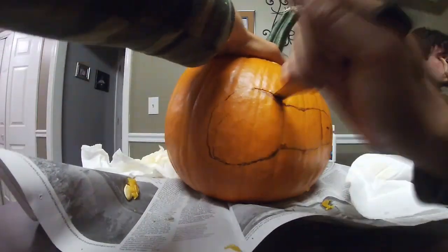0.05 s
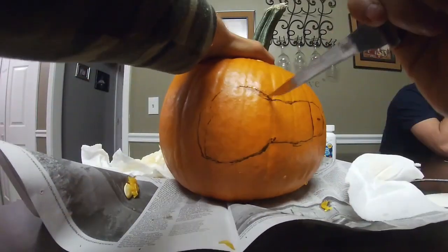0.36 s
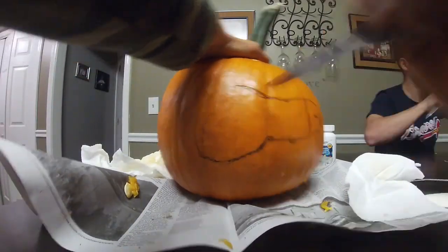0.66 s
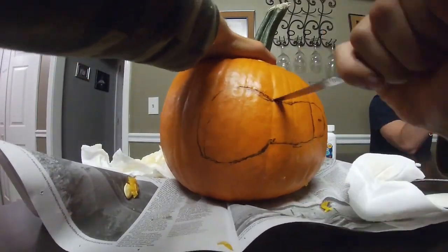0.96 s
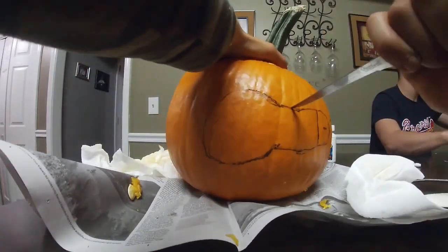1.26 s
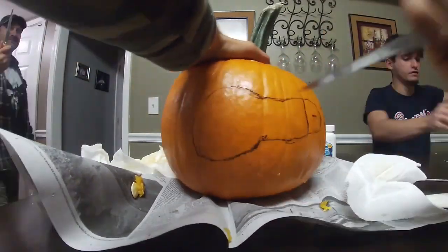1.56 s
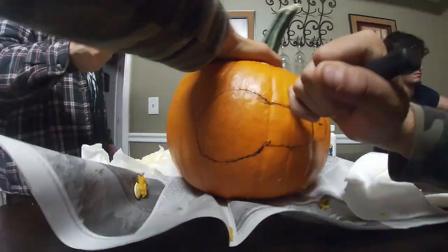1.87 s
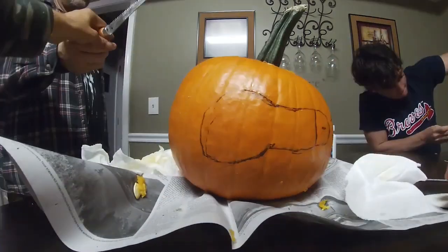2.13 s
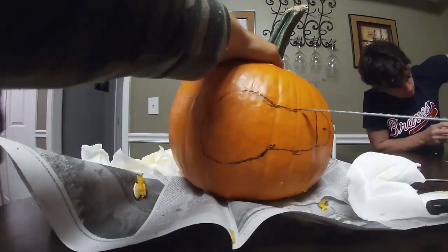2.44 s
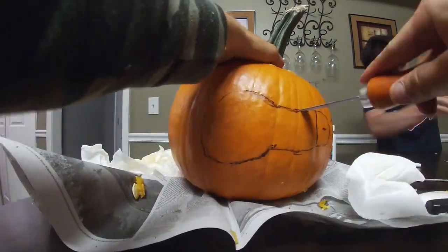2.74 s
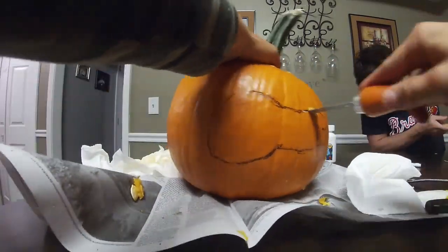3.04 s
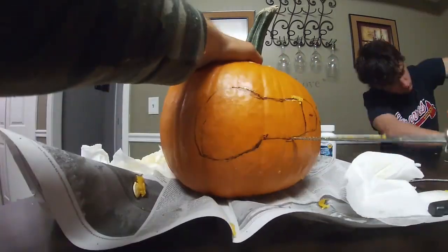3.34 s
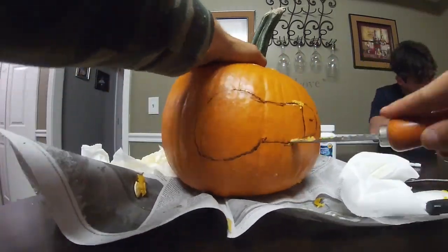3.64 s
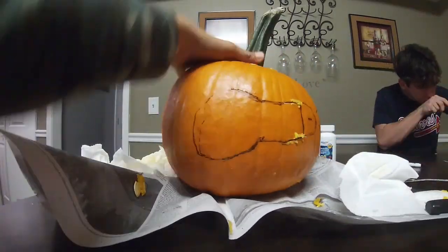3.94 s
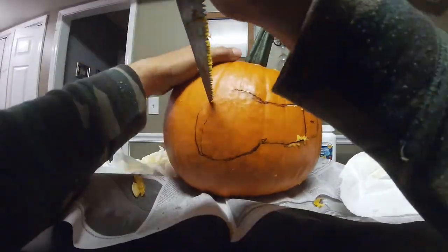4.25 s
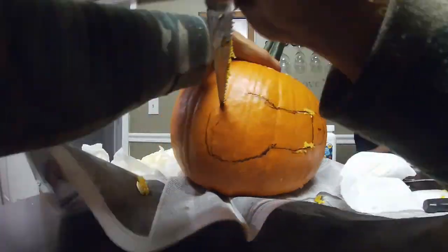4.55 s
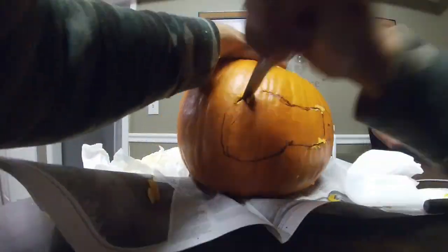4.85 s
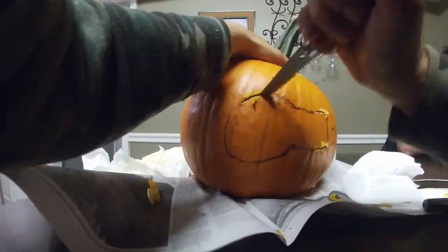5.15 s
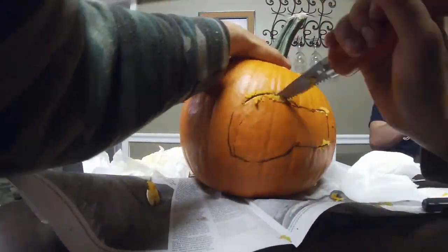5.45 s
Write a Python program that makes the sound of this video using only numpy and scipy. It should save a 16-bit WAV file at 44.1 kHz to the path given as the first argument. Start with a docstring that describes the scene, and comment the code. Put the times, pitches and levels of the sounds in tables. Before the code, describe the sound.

A knife works through a pumpkin in short, uneven strokes close to the microphone. The rind splits with small cracks that thud in the hollow fruit, and the toothed blade scrapes between them. The wet flesh squeaks against the steel several times, then rasps and judders near the end. Tiny juice pops, a few soft bumps on the table and faint rustling of hands and paper fill the gaps in a small, quiet room.

```python
"""A knife is worked through a pumpkin on a newspaper-covered table, close by, in a small room.
The rind splits in short cracks that thud in the hollow fruit. The knife's teeth scrape and make the
blade ring. The wet flesh grips the steel and lets it slip, so it squeals, rasps and judders.
Juice pops in the cut, the fruit rocks on the table, and hands and paper rustle in between."""
import sys
import numpy as np
from scipy import signal
from scipy.fft import rfft, irfft
from scipy.io import wavfile
from scipy.ndimage import uniform_filter1d, map_coordinates

SR = 44100
rng = np.random.default_rng(int(sys.argv[2]) if len(sys.argv) > 2 else 0)


def persist_wave(psi):
    """Save psi, clipped to +-1, as 16-bit WAV."""
    counts = np.round(np.clip(psi, -1, 1) * 32767).astype(np.int16)
    wavfile.write(sys.argv[1], SR, np.atleast_2d(counts).T)


N = 246959
TIME = np.arange(N) / SR
TOP_HZ = 16000

# Splits in the rind: t/s, level/dB, snap against thud/dB, run time/s
CRACKS = [(0.046, -13.5, -24, 0.015), (0.062, -17.5, -20, 0.0027), (0.091, -27, -2, 0.01),
          (0.103, -21.5, -7.5, 0.029), (0.151, -25.5, -45, 0.0049), (0.231, -29.5, -30, 0.0034),
          (0.698, -28, 1, 0.019), (0.723, -24.5, -6, 0.014), (0.753, -30.5, -27, 0.0034),
          (1.06, -20, -20, 0.011), (1.083, -19.5, -24, 0.0095), (1.111, -18, -27, 0.0087),
          (1.149, -21, -44, .01), (1.917, -18.5, -15, 0.02), (1.963, -24.5, -11, 0.029),
          (2.026, -22.5, -41, 0.0038), (2.051, -22.5, -49, .005), (2.382, -26.5, -23, 0.0034),
          (2.779, -29.5, -34, 0.0061), (2.861, -26.5, -10, .035), (2.904, -16.5, -38, 0.02),
          (2.972, -30, -39, 0.033), (3.019, -24.5, -33, 0.0066), (3.063, -23.5, -37, 0.039),
          (3.14, -29, -14.5, 0.029), (3.184, -22, -26, 0.0089), (3.483, -36, -21, 0.013),
          (3.564, -22, -24, .005), (3.618, -16.5, -41, 0.0054), (3.681, -38, -33, 0.041),
          (3.74, -19, -17, 0.014), (3.756, -15, -50, 0.014), (3.831, -19, -35, 0.0051),
          (3.868, -24.5, -19, 0.013), (4.037, -22.5, 0.5, 0.02), (4.532, -31.5, -30, 0.013),
          (4.602, -13.5, -34, 0.0095), (4.736, -16, -17, 0.0073), (4.748, -17, -11.5, 0.017),
          (4.822, -31, -2.5, .005), (5.571, -29.5, -18, 0.017)]
# Short pushes of the blade: t/s, rise/s, level/dB, centre f/Hz, wetness/dB
SCRAPES = [(0.038, 0.0074, -31, 2250, -6), (0.65, 0.0021, -36.5, 2310, -13),
           (0.667, 0.0082, -28, 2230, -10), (1.048, .002, -32, 2370, -9), (1.322, 0.00076, -32, 2870, 3),
           (1.341, 0.0098, -28, 2870, 5), (1.379, 0.0096, -35, 1900, -26), (1.499, .0074, -28.5, 1560, -37),
           (1.514, 0.016, -31.5, 2180, -9.5), (1.597, 0.0084, -25.5, 3270, -30),
           (1.62, 0.0061, -28, 3030, -55), (1.682, 0.0016, -24, 2190, -25),
           (1.819, 0.0044, -39.5, 1980, -13), (1.899, 0.0045, -34.5, 2960, -3.5),
           (2.091, 0.0014, -43, 2380, -28), (2.31, .0024, -25.5, 2830, 0.5), (2.37, 0.017, -34, 1760, -38),
           (2.496, 0.0013, -35.5, 1600, -33), (2.604, 0.0009, -33, 2170, -9.5),
           (2.688, 0.0049, -42, 2400, -6), (2.735, 0.019, -23.5, 1980, -19),
           (2.822, 0.0032, -31.5, 1880, -17), (2.988, 0.012, -25, 2170, -18.5),
           (3.04, 0.018, -33.5, 2210, -16), (3.555, 0.0018, -32.5, 1700, -12),
           (3.593, 0.015, -28.5, 2120, -10.5), (3.725, .013, -27, 2370, -13.5),
           (3.817, 0.0065, -28, 1890, -12), (3.868, 0.017, -35, 1910, -15), (4.315, 0.0031, -39, 1900, -56),
           (4.49, 0.00033, -21.5, 2750, -48), (4.523, 0.003, -39, 2250, -6),
           (4.668, .0054, -32.5, 2790, -18), (4.717, 0.007, -22, 3020, -14),
           (4.814, 0.0063, -22.5, 2600, -2.5), (4.832, 0.016, -26, 2280, -6), (4.869, 0.002, -28, 2550, -5),
           (4.914, 0.011, -30.5, 2150, -24), (5.265, 0.013, -32, 2400, -10),
           (5.496, 0.0013, -32, 2210, -26)]
# Clean, squealing slides: t/s, length/s, level/dB, slip f/Hz, glide/share, arch/share, sharpness/dB
SQUEALS = [(1.387, .024, -5.5, 1302, -0.24, -0.066, -9), (1.411, 0.018, -9.5, 1205, -0.11, 0.043, -11),
           (2.122, 0.022, -11, 1218, 0.045, -0.0088, -13), (2.146, 0.033, -13.5, 1239, -0.054, -0.018, -15),
           (2.187, 0.012, -18, 1230, -0.13, 0.11, -16), (2.204, 0.019, -21.5, 1186, -0.051, 0.058, -4),
           (2.236, 0.011, -9, 1216, 0.026, 0.085, -26), (2.255, 0.0084, -16, 1193, -0.039, 0.035, 9),
           (2.272, 0.021, -18.5, 1403, -0.039, -0.008, -7.5), (2.848, .017, -14.5, 1180, -0.132, -0.11, 9),
           (2.865, 0.033, -20, 1105, 0.048, 0.049, -5.5), (3.932, 0.02, -10.5, 1298, -0.14, 0.15, 5.5),
           (3.953, 0.02, -16.5, 1103, 0.019, -0.015, -6), (3.967, .031, -20.5, 1208, -0.093, 0.086, 16),
           (3.998, 0.035, -23, 1048, 0.045, 0.024, -6), (4.025, 0.032, -20, 1120, -0.089, 0.028, -7),
           (4.06, 0.023, -18, 1081, -0.06, 0.033, -19.5), (4.082, 0.012, -19.5, 1144, -0.023, 0.12, -17),
           (4.102, 0.019, -14.5, 1196, 0.077, 0.0034, -43)]
# Slower, hoarser slides: same columns as SQUEALS
RASPS = [(1.204, 0.017, -29, 1040, 0.18, 0.023, -8), (1.228, 0.049, -35, 764, 0.065, 0.038, 9),
         (1.283, 0.023, -31.5, 880, 0.13, 0.037, 12.5), (1.33, 0.034, -23.5, 1120, -0.32, 0.011, -19),
         (1.596, 0.073, -24, 992, -0.34, 0.0027, -34), (4.978, 0.0417, -17, 876, 0.094, 0.049, -1.5),
         (5.037, 0.0079, -9, 1010, -0.094, 0, -18), (5.054, 0.036, -21.5, 908, -0.072, 0.029, 2.5),
         (5.093, 0.046, -19.5, 924, -0.056, 0.013, 4.5), (5.138, 0.053, -23.5, 975, 0.0083, 0.0077, 9.5),
         (5.196, 0.025, -18, 1025, -0.043, 0, 5), (5.223, 0.04, -17.5, 1049, -0.021, 0.0026, 0),
         (5.352, 0.028, -15, 867, -0.17, 0, -11), (5.379, 0.024, -16.5, 848, 0.1, 0.039, 2),
         (5.525, 0.039, -24.5, 817, 0.23, 0.038, 4), (5.557, 0.097, -29, 988, -0.011, 0, 13.5)]
# Slips that lose their rhythm: t/s, rise/s, fall/s, relative level/dB
JUDDERS = [(2.868, 0.03, 0.012, -28.5), (5.005, 0.01, 0.0099, -18), (5.158, 0.0009, 0.016, -15),
           (5.229, 0.011, 0.011, -19), (5.376, 0.0046, 0.021, -17.5), (5.437, .0075, 0.016, -16.5),
           (5.562, 0.0089, 0.027, -17.5)]
# Juice pops in the cut: t/s, relative level/dB
POPS = [(0.0094, -31.5), (0.1296, -45), (0.191, -48), (0.226, -43), (0.3167, -43), (0.4563, -48),
        (0.5756, -44), (0.635, -39), (0.9878, -32.5), (1.0164, -27.5), (1.1308, -33.5), (1.545, -22),
        (2.135, -26), (2.1664, -39), (2.234, -34), (3.1416, -30.5), (3.1643, -37), (3.271, -42.5),
        (3.3308, -35.5), (3.409, -38), (3.496, -42), (3.9256, -24), (4.029, -26), (4.103, -35),
        (4.417, -40), (4.796, -34)]
# The pumpkin rocks against the table: t/s, f/Hz, level/dB
BUMPS = [(1.546, 114, -9.5), (1.575, 99, -19.5), (2.504, 145, -25), (2.697, 128, -23.5), (4.914, 139, -24),
         (5.01, 100, -30.5)]
# How busily the hands move on fruit and paper: t/s, relative level/dB
HANDS = [(0, -47), (.25, -60.5), (.58, -64), (.68, -56), (.79, -70), (.95, -64), (1.08, -62), (1.55, -43.5),
         (1.77, -58), (2, -53), (2.46, -58), (2.85, -41.5), (3.17, -55.5), (3.25, -66), (3.52, -47),
         (4.08, -48.5), (4.18, -66.5), (4.38, -57), (4.48, -48.5), (4.95, -46), (5.6, -48.5)]

# The notes at which a thing rings: f/Hz, width/Hz, level/dB
FRUIT_MODES = [(150, 90, -9.5), (295.7, 104, 3), (380, 34, -4), (585, 130, -13), (773, 540, -35)]  # the hollow fruit
BLADE_MODES = [(1160, 160, -9), (1450, 110, -2), (1870, 110, -4), (2085, 100, 2), (2580, 220, -3),
               (3050, 250, -6), (3690, 200, -6), (4680, 300, -8), (5950, 400, -13)]  # the blade held in the flesh

# Tone colours, or how strong a sound is from bass to treble: f/Hz, level/dB
SNAP_TONE = [(200, -1), (600, 5), (1300, 4), (1900, -1), (2800, -11.5), (4200, -26.5), (16000, -50.5)]  # snapping rind
FLESH_TONE = [(50, -9), (150, -4.5), (800, -2), (1500, -13.5), (4000, -18.5)]  # muffling by the flesh
TEETH_TONE = [(300, -63.5), (900, 21), (1400, 29), (2500, 6), (4500, 15), (7000, -19.5), (16000, 5.5)]  # the knife's teeth
FIZZ_TONE = [(2000, 9.5), (4500, -2.5), (6500, 5), (16000, 5.5)]  # fizzing juice
SQUEAL_TONE = [(700, 8), (1250, 3), (1900, -4), (2450, 9.5), (2900, -4.5), (3600, -1.5), (4600, -11),
               (5600, -8), (7500, -22), (12500, -16.5), (16000, -15.5)]
RASP_TONE = [(750, -16), (1100, -10.5), (1750, 4), (3200, 4.5), (4300, 4), (5200, -7), (6500, -20.5),
             (16000, -14)]
JUDDER_TONE = [(200, 0), (800, -7.5), (1400, 12), (3200, 5), (4300, -2), (6000, -33), (16000, -13)]
AIR_TONE = [(30, -14), (130, 14.5), (380, -8.5), (720, -20.5), (2100, 12.5), (4400, -17.5), (16000, -5.5)]  # the quiet room
WALL_TONE = [(100, -34.5), (320, -1), (700, -25), (2200, -2), (4000, -28.5), (16000, 12)]  # echo from the walls
GRIT_TONE = [(400, -32), (1400, -3), (2400, 0), (4200, -4), (7000, -19), (16000, -28)]
RUSTLE_TONE = [(600, -18), (1200, 0), (2600, 0), (4000, -8), (8000, -14)]


def undb(db):
    """Turn decibels into a number to multiply by."""
    return 10 ** (np.asarray(db) / 20)


def unit(x):
    """Scale x to an average strength (rms) of 1."""
    return x / np.sqrt(np.mean(x ** 2) + 1e-18)


def unit_burst(x, seconds):
    """Give a burst the energy of a sound of strength 1 lasting this long."""
    return x / np.sqrt(np.sum(x ** 2) / (seconds * SR) + 1e-18)


def add(out, start, x):
    """Mix x into out, beginning at start seconds."""
    i = int(np.clip(start * SR, 0, N - 1))
    out[i:i + len(x)] += x[:N - i]


def gain_at(tone, hz):
    """Look up how strong a tone colour is at these frequencies."""
    freqs, db = np.transpose(tone)
    return undb(np.interp(np.log(np.maximum(hz, 1)), np.log(freqs), db))


def colour(x, tone, size=1024):
    """Filter x so that it takes on a tone colour."""
    hz = np.arange(size // 2 + 1) * SR / size
    cepstrum = irfft(np.log(gain_at(tone, hz)))
    # fold the second half onto the first, so the filter never sounds ahead of its input
    cepstrum[1:size // 2] *= 2
    cepstrum[size // 2 + 1:] = 0
    response = irfft(np.exp(rfft(cepstrum)))
    return signal.fftconvolve(x, response)[:len(x)]


def ring(x, modes):
    """Let x ring all of a thing's notes at once."""
    return sum(undb(db) * signal.lfilter(*signal.iirpeak(hz, hz / width, fs=SR), x)
               for hz, width, db in modes)


def wander(rate, size):
    """A smooth curve through rate random values a second, with a spread near 1."""
    at = np.arange(size) * rate / SR
    return map_coordinates(rng.standard_normal(int(at[-1]) + 2), [at], order=2, mode="nearest")


def grains(size, rate, spread_db):
    """Tiny random clicks of unequal strength, about rate of them a second."""
    chance, strength = rng.random(size), rng.standard_normal(size)
    return (chance < rate / SR) * rng.choice([-1, 1], size) * undb(spread_db * np.clip(strength, -2, 2))


def swell(t, rise, fall, drop_db):
    """Grow for rise seconds, then lose drop_db every fall seconds."""
    return np.minimum(t / rise, 1) * undb(-drop_db * np.maximum(t - rise, 0) / fall)


def room_air(level_db=-59.5):
    """The faint, steady noise of the room."""
    return undb(level_db) * unit(colour(rng.standard_normal(N), AIR_TONE, size=8192))


def room_echo(x, near_db=-16, near_s=0.007, late_db=-25, late_s=0.36):
    """Sound bounces quickly off table and fruit, then rings faintly between the walls."""
    t = TIME[:SR // 2]
    near_fade = np.exp(-t / near_s)
    near = rng.standard_normal(len(t)) * near_fade
    late = colour(rng.standard_normal(len(t)), WALL_TONE) * undb(-60 * t / late_s) * (1 - near_fade)
    echo = undb(near_db) * near / np.linalg.norm(near) + undb(late_db) * late / np.linalg.norm(late)
    return x + signal.fftconvolve(x, echo)[:N]


def handling(splits, rumble_db=3, rustle_db=5, crinkle_db=-12, creak_db=-14.5, creak_s=0.051):
    """Hands, blade and paper shift in little bunches of clicks; the flesh creaks around each split."""
    busy = undb(np.interp(TIME, *np.transpose(HANDS)))
    width = int(creak_s * SR)
    strain = uniform_filter1d(uniform_filter1d(np.abs(splits), width), width // 2 + 1)
    nudges = np.abs(grains(N, rate=45, spread_db=3))
    shifts = signal.lfilter([1], [1, -np.exp(-1 / (0.008 * SR))], nudges)  # each lingers about 8 ms
    bunches = 0.3 + unit(shifts)
    rubs, clicks, crinkles = (grains(N, rate=2500, spread_db=4) * bunches for _ in range(3))
    body = unit(colour(ring(rubs, FRUIT_MODES), FLESH_TONE))
    rustle = undb(rustle_db) * unit(colour(ring(clicks, BLADE_MODES), RUSTLE_TONE))
    crinkle = undb(crinkle_db) * unit(colour(crinkles, FIZZ_TONE))
    creak = undb(creak_db) * strain * body
    return busy * (undb(rumble_db) * body + rustle + crinkle) + creak


def bumps(rise_s=0.004, fall_s=0.027):
    """The heavy fruit rocks and the table answers with a few quick swings."""
    out, t = np.zeros(N), TIME[:SR // 6]
    for start, hz, db in BUMPS:
        add(out, start, undb(db) * swell(t, rise_s, fall_s, drop_db=33) * np.sin(2 * np.pi * hz * t))
    return out


def juice(clicks):
    """Tiny wet pockets along the blade give each burst of clicks its own high notes."""
    pockets = [(hz, 500, 0) for hz in rng.uniform(5000, 15500, size=5)]
    return unit(unit(colour(clicks, FIZZ_TONE)) + 3.9 * unit(ring(clicks, pockets)))


def pops(rise_s=0.00057, fall_s=0.023, gain_db=-12, blade_db=-5):
    """Pockets of juice burst with a small, high fizz that just stirs the blade."""
    out, t = np.zeros(N), TIME[:SR // 16]
    for start, db in POPS:
        burst = grains(len(t), rate=4000, spread_db=4) * swell(t, rise_s, fall_s, drop_db=15)
        fizz = juice(burst) + unit(colour(burst, FIZZ_TONE))
        steel = undb(blade_db) * unit(ring(burst, BLADE_MODES))
        add(out, start, undb(db + gain_db) * unit_burst(fizz + steel, rise_s + fall_s))
    return out


def judders(slip_hz=620, scatter=0.51, gain_db=-1):
    """Under too much force the blade jumps in hard, uneven slips."""
    out, t = np.zeros(N), TIME[:SR // 10]
    for start, rise, fall, db in JUDDERS:
        rate = slip_hz * np.exp(scatter * wander(slip_hz, len(t)))
        slips = np.diff(np.floor(np.cumsum(rate) / SR), prepend=0)  # one click for each slip
        slips *= undb(2 * rng.standard_normal(len(t))) * swell(t, rise, fall, drop_db=13)
        sound = colour(unit(slips) + 0.18 * unit(ring(slips, BLADE_MODES)), JUDDER_TONE)
        add(out, start, undb(db + gain_db) * unit_burst(sound, rise + fall))
    return out


def slide(t, length, hz, glide, arch, catch_s=0.0062, sag_db=4.5, release_s=0.0045, release_db=7):
    """Pitch and grip of one slide: the blade changes speed; the flesh catches, yields and lets go."""
    along = np.minimum(t / length, 1)
    rate = hz * (1 + glide * (along - 0.5) + arch * (np.sin(np.pi * along) - 2 / np.pi))
    letting_go = np.maximum((t - length) / release_s + 1, 0)
    grip = np.minimum(t / catch_s, 1) * undb(-sag_db * along - release_db * letting_go)
    return rate, grip


def stick_slip(slides, tone, jitter, grit_db, body_db=-15.5, overtones=13):
    """The blade sticks and slips about a thousand times a second, now cleanly, now raggedly."""
    out, t = np.zeros(N), TIME[:SR // 12]
    multiples = np.arange(1, overtones + 1)[:, None]
    for start, length, db, slip_hz, glide, arch, sharp_db in slides:
        smooth_rate, grip = slide(t, length, slip_hz, glide, arch)
        # fibres catch the edge in patches: there the slips are uneven and gritty
        ragged = np.exp(0.9 * np.tanh(wander(80, len(t))))
        rate = smooth_rate * (1 + jitter * ragged * wander(650, len(t)))
        phase = 2 * np.pi * np.cumsum(rate) / SR
        hz = multiples * rate
        # the contact shifts, so each overtone grows and fades
        flutter = undb(4.5 * np.array([wander(130, len(t)) for _ in multiples]))
        # juice softens each slip: 5.5 dB less per octave above 8000 Hz
        softening = undb(-5.5 * np.maximum(np.log2(hz / 8000), 0))
        gain = gain_at(tone, hz) * (hz < TOP_HZ) * flutter * softening
        gain /= np.sqrt(np.sum(gain ** 2, axis=0) / 2)
        # the grip stutters; sharper slips reach further into the treble
        stutter = wander(170, len(t))
        treble = np.clip((hz - 3500) / 1800, 0, 1)
        gain *= undb((sharp_db + 3 * stutter - 1) * treble)
        offsets = 2 * np.pi * rng.random(multiples.shape)
        voice = np.sum(gain * np.sin(multiples * phase + offsets), axis=0)
        # each slip sheds a puff of grit, and the hollow fruit hums along
        puffs = rng.standard_normal(len(t)) * (1 + np.cos(phase))
        grit = ragged * unit(colour(puffs, GRIT_TONE))
        hum = ring(ring(puffs, FRUIT_MODES), FRUIT_MODES)
        body = undb(body_db) * unit(colour(hum, FLESH_TONE))
        sound = voice + undb(grit_db) * (grit + body)
        add(out, start, undb(db + 1.8 * stutter) * grip * sound)
    return out


def scrapes(fall_s=0.0091, ring_db=3, body_db=-14):
    """Teeth break cells by the hundred; the clicks ring the blade and the fruit, and the juice fizzes."""
    out, t = np.zeros(N), TIME[:SR // 8]
    for start, rise, db, hz, wet_db in SCRAPES:
        push = swell(t, rise, fall_s, drop_db=10)
        clicks, bursts = (grains(len(t), rate=4000, spread_db=4) * push for _ in range(2))
        steel = unit(colour(clicks, TEETH_TONE)) + undb(ring_db) * unit(ring(clicks, BLADE_MODES))
        treble_db = -4 + 0.42 * wet_db  # a dry cut has less treble than a wet one
        # the depth of the blade decides which of its notes ring most
        depth_tone = [(hz / 4, -18), (hz / 1.56, -6), (hz, 0), (hz * 1.22, -4),
                      (hz * 1.84, treble_db), (hz * 4, treble_db - 3.5)]
        fizz = undb(wet_db - 1) * juice(bursts)
        body = undb(body_db) * unit(ring(clicks, FRUIT_MODES))
        sound = unit(colour(steel, depth_tone)) + fizz + body
        push_share = (rise + fall_s) * SR / len(t)
        add(out, start, undb(db) * np.sqrt(push_share) * sound)
    return out


def rind_chirp(x, lag_s):
    """High notes cross the rind faster, so a knock chirps downward; lag_s is the delay at 300 Hz."""
    hz = np.fft.rfftfreq(len(x), 1 / SR)
    return irfft(rfft(x) * np.exp(-4j * np.pi * lag_s * np.sqrt(300 * hz)), len(x))


def fibre_break(snap_db, tear_s=0.0084, tear_db=-13):
    """One jolt and a brief tearing make a snap, and a thud in the hollow fruit."""
    t = TIME[:SR // 14]
    force = undb(tear_db) * grains(len(t), rate=2500, spread_db=4) * np.exp(-t / tear_s)
    force[0] += 1  # the jolt
    thud = unit_burst(colour(ring(force, FRUIT_MODES), FLESH_TONE), seconds=0.0059)
    snap = unit_burst(colour(force, SNAP_TONE), seconds=0.048)
    return thud + undb(snap_db) * snap


def cracks(fibres=5, gap_s=0.008, scatter=0.25, fade_db=8.5, dull_db=5, lag_s=0.00246):
    """The knife splits the rind, and each split runs from fibre to fibre, ever weaker and duller."""
    out = np.zeros(N)
    for start, db, snap_db, run_s in CRACKS:
        gaps = gap_s * np.exp(scatter * rng.standard_normal(fibres))
        for after_s in np.cumsum(gaps) - gaps[0]:
            spent = after_s / run_s
            sound = rind_chirp(fibre_break(snap_db - dull_db * spent), lag_s)
            add(out, start + after_s - lag_s / 2, undb(db - fade_db * spent) * sound)
    return out


def scene():
    """Knife, hands and table sound together in the room, over its quiet air."""
    squeals = stick_slip(SQUEALS, SQUEAL_TONE, jitter=0.013, grit_db=-18)
    rasps = undb(-1) * stick_slip(RASPS, RASP_TONE, jitter=0.024, grit_db=-12)
    splits = cracks()
    knife = splits + scrapes() + squeals + rasps + judders() + pops()
    air = room_air()
    return (room_echo(knife + handling(splits) + bumps()) + air)[None]


def record(dry, ceiling=0.7, bass_hz=52):
    """Round off the highest peaks, thin the lowest bass and cut the very top."""
    rounded = ceiling * np.tanh(dry / ceiling)
    thinned = signal.sosfilt(signal.butter(3, bass_hz, "high", fs=SR, output="sos"), rounded)
    return signal.sosfilt(signal.ellip(10, 0.2, 70, TOP_HZ, fs=SR, output="sos"), thinned)


dry = scene()
out = record(dry)
persist_wave(out)
```